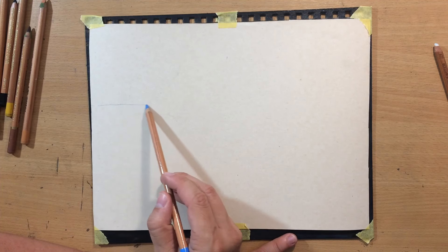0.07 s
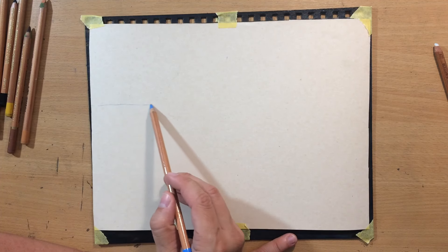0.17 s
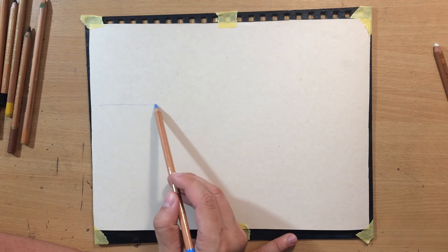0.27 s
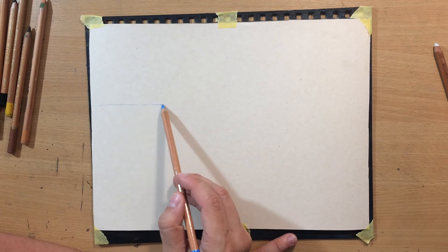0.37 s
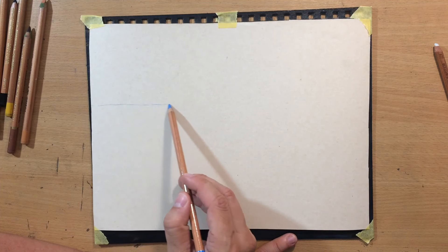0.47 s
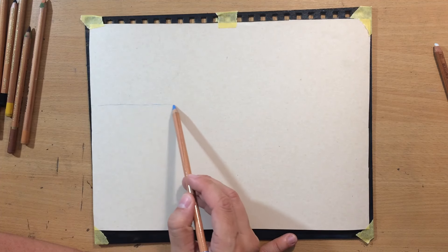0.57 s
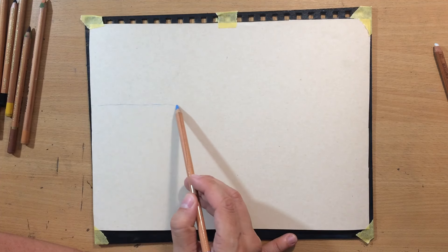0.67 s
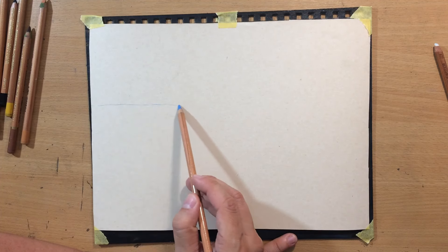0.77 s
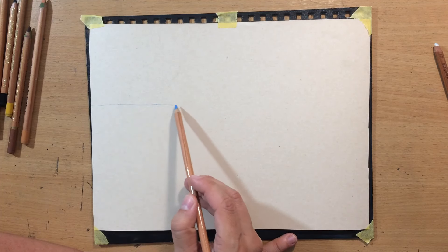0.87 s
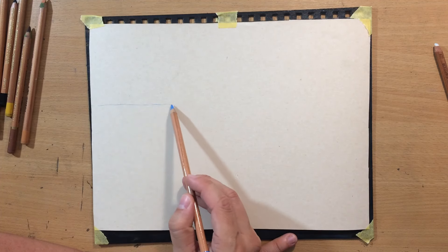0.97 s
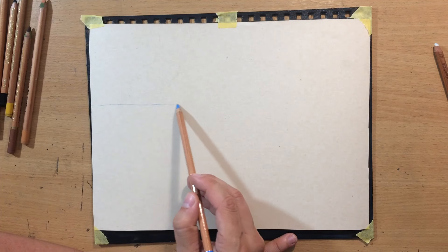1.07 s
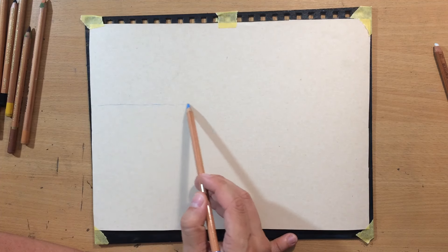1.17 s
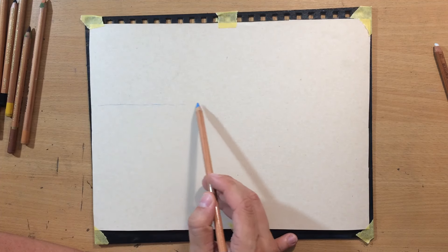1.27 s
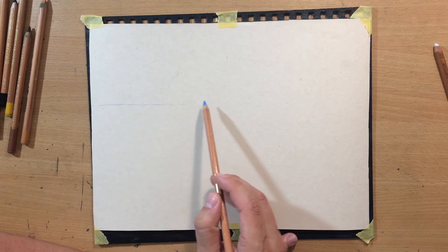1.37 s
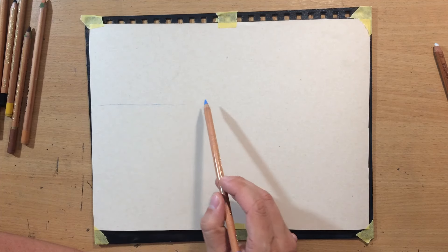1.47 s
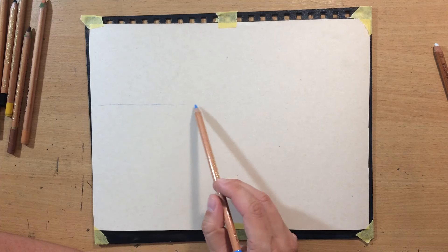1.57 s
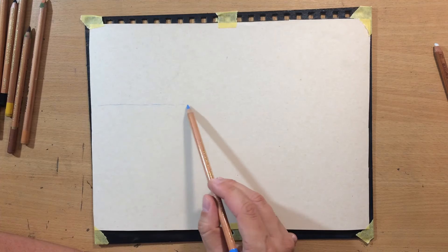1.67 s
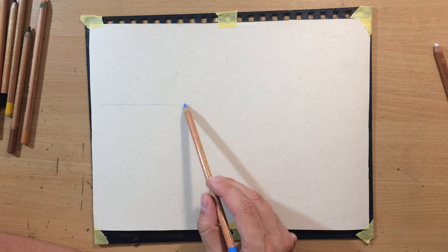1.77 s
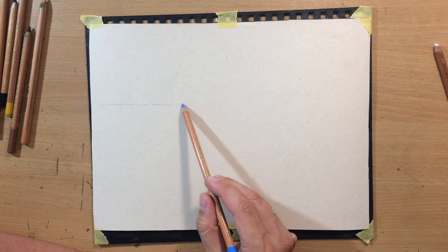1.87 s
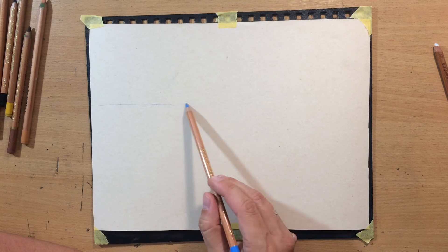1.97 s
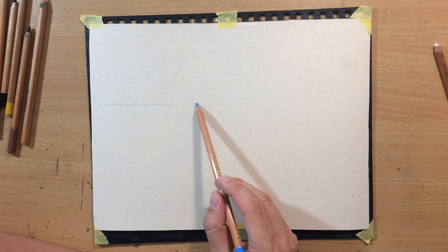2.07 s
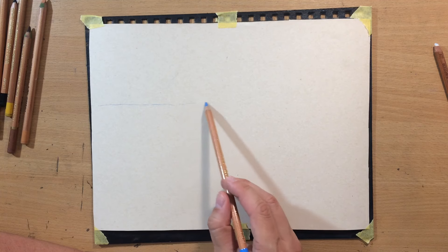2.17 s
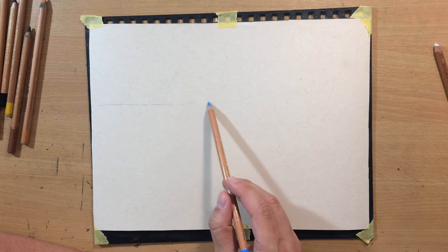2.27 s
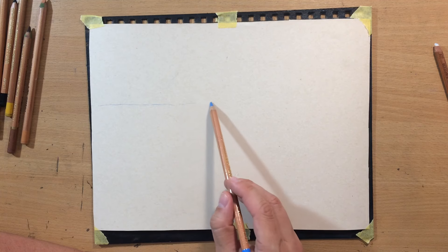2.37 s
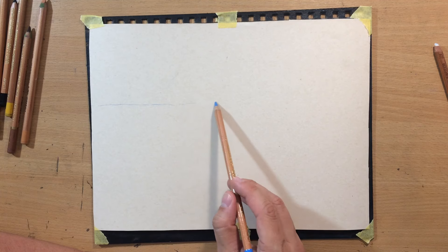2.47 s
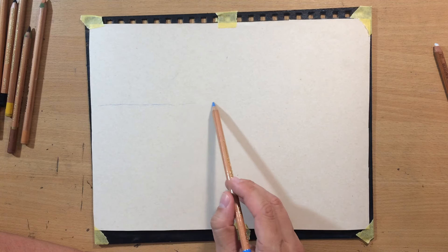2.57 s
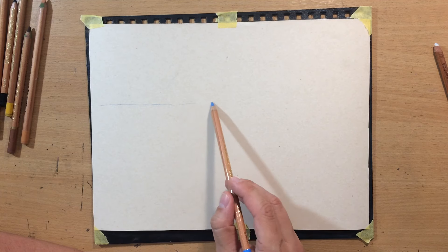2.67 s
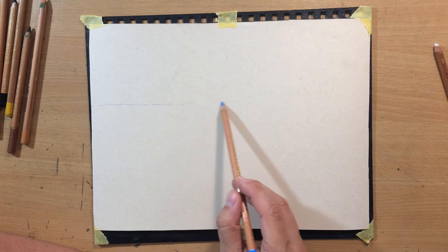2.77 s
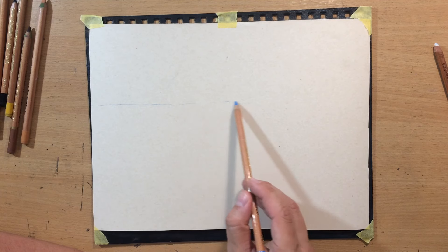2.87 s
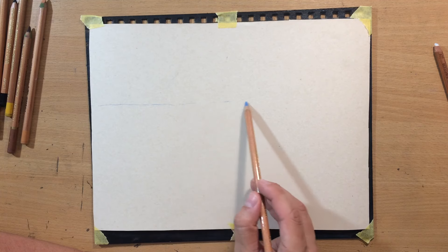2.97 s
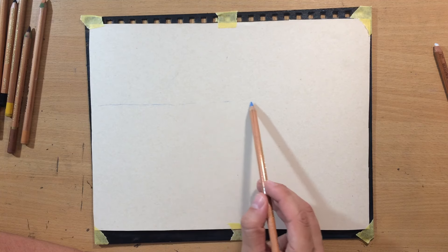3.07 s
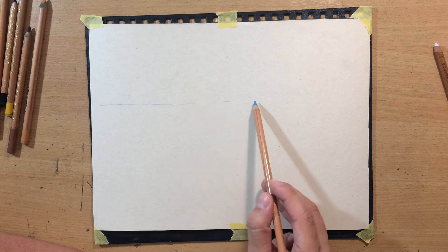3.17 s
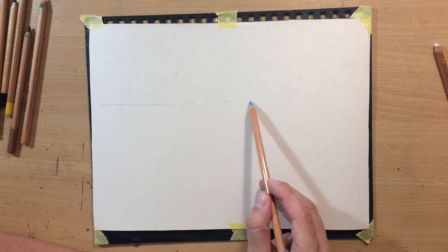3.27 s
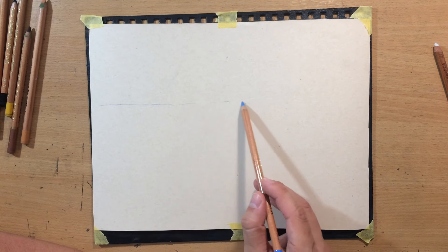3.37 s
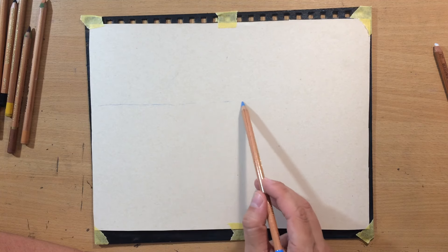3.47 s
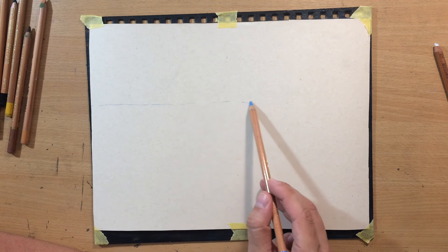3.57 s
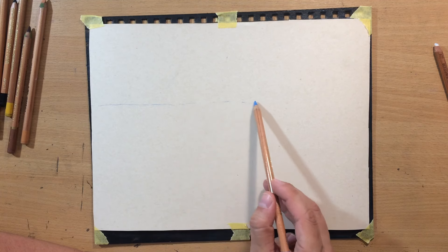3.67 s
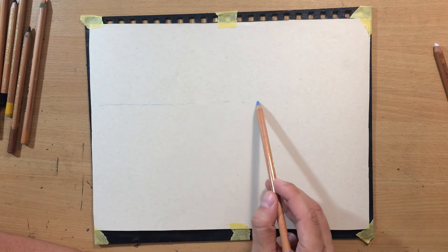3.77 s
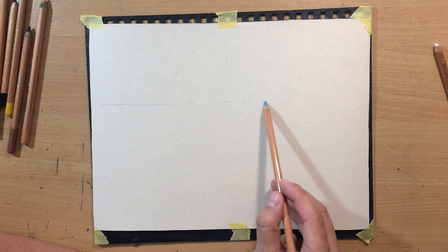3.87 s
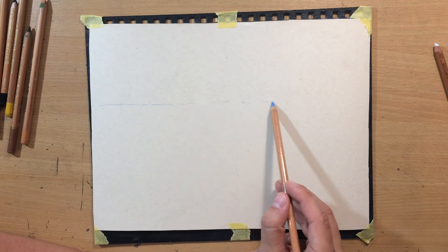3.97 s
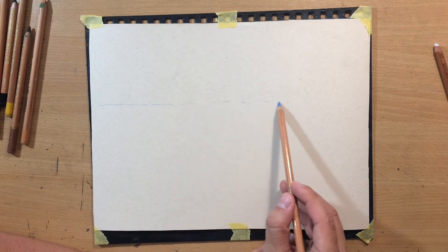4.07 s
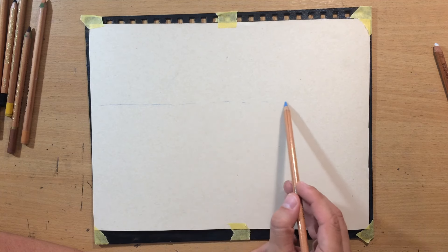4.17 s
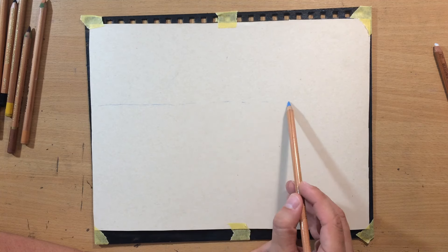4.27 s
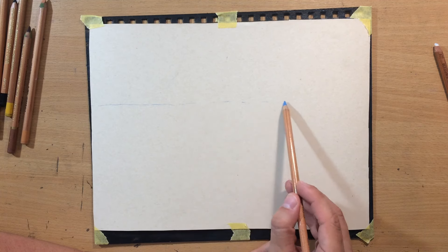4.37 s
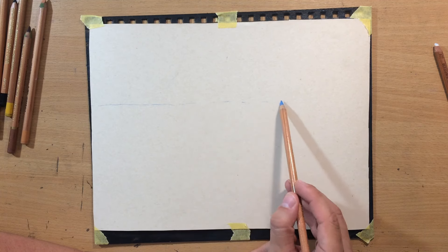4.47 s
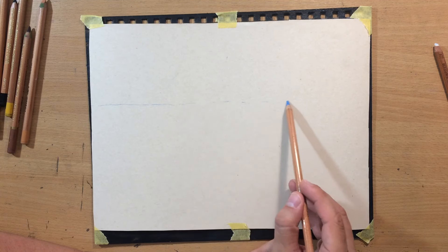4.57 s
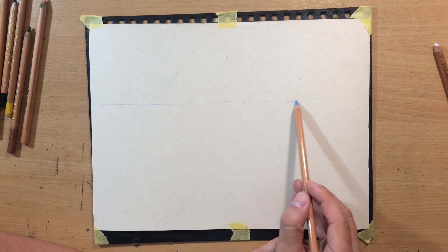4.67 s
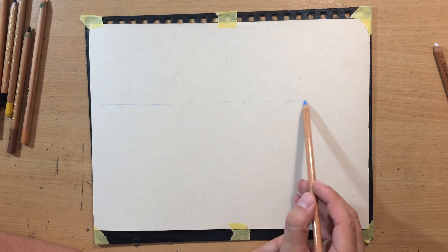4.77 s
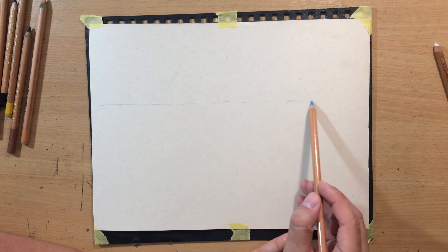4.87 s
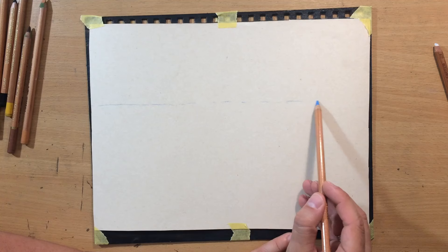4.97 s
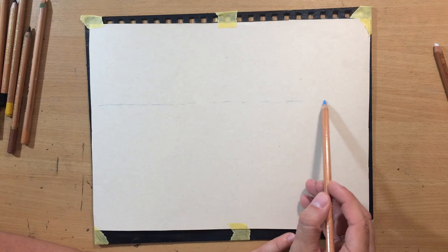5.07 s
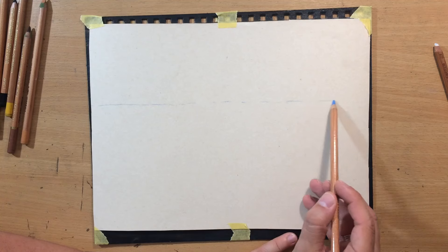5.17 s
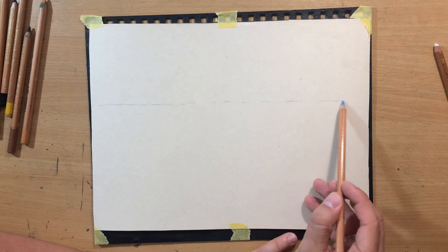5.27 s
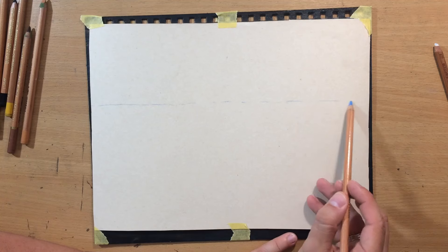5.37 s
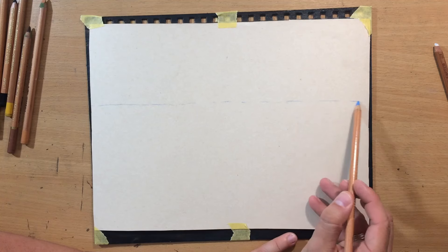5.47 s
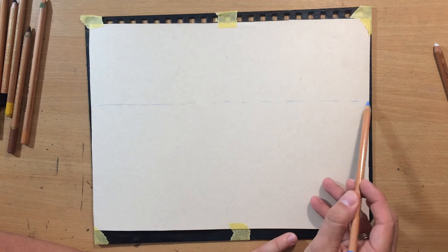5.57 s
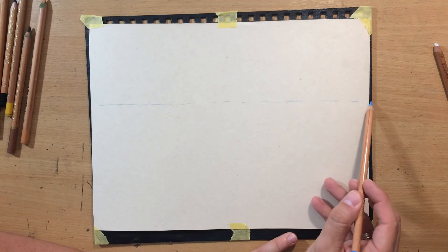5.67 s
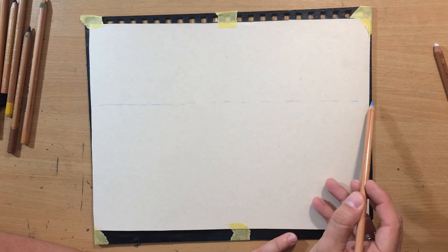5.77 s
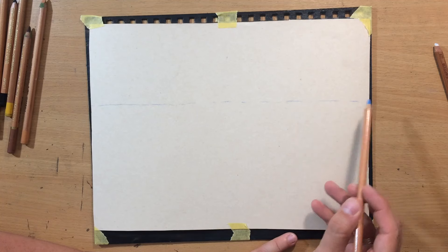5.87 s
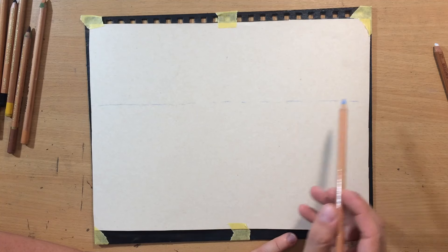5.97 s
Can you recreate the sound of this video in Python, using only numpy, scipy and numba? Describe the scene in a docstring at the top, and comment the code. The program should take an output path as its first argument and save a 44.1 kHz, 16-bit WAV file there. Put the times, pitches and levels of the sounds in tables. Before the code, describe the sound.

A pencil tip scrapes along sanded paper in one slow stroke, followed by a cluster of dull taps and small clicks as the pad bumps the desk and a hand shifts softly. A run of brief, uneven scratches follows, with a longer rasping stroke near the end. The sounds are quiet, dry and close, in a small room where a distant motor hums steadily.

```python
"""Pastel pencil on sanded paper

Close to one microphone in a small room, a pastel pencil draws a broken line across sanded paper
taped to a pad on a wooden desk. The tip catches on the grit: a bright rasp, and a ring of the lead
near 2 kHz that follows the grip. The pencil taps the pad against the desk as the hand shifts.
Farther off, a motor hums steadily under soft room air."""
import sys
import numpy as np
from scipy import signal
from scipy.fft import rfft, irfft
from scipy.io import wavfile
from scipy.ndimage import uniform_filter1d, map_coordinates
from numba import njit

SR = 44100
rng = np.random.default_rng(int(sys.argv[2]) if len(sys.argv) > 2 else 0)


def persist_wave(psi):
    """Save psi, clipped to +-1, as 16-bit WAV."""
    counts = np.round(np.clip(psi, -1, 1) * 32767).astype(np.int16)
    wavfile.write(sys.argv[1], SR, np.atleast_2d(counts).T)


N = 265790
TIME = np.arange(N) / SR


def pencil():
    """Fine grit makes the rasp; coarser catches ring the lead; the sheet radiates both."""
    stroke_rasp, stroke_ring, stroke_grip = quick_strokes()
    drag_rasp, drag_ring, drag_grip = slow_drags()
    rasp_gain, ring_gain = add_snags(stroke_rasp + drag_rasp, stroke_ring + drag_ring)
    lead_hz, lead_width, overtone_db, bright_db = curves(sorted(stroke_grip + drag_grip))
    tooth = drift(260)  # the paper's uneven tooth shakes the contact force
    rasp = tip_rasp(tooth, bright_db)
    ring = lead_ring(tooth, lead_hz, lead_width, overtone_db)
    return sheet_resonances(rasp_gain * rasp + ring_gain * ring)


# Quick strokes on the paper, close to the microphone. Each row: landing, lift, attack and release in
# seconds, rasp level, ring level, midway sag and tightening of the grip in dB, ring pitch and width
# in Hz, overtones and brightness in dB.
QUICK_STROKES = [ (1.204, 1.293, 0.0052, 0.0026, -44.5, -42.5, -2, -4.5, 2120, 393, 4, -1.5),
                 (2.109, 2.243, 0.017, 0.029, -46.5, -46.5, -2, 4, 2120, 800, 3, -0.5),
                 (2.35, 2.54, 0.0033, 0.11, -59.5, -55.5, 5, 1, 2000, 604, -9, -33),
                 (2.541, 2.617, 0.007, 0.022, -49.5, -51, 3.5, 7, 1930, 560, 5, -1.5),
                 (2.896, 2.991, 0.025, 0.012, -47, -45.5, 1.5, 5, 2050, 402, -2, 8),
                 (3.164, 3.294, 0.032, 0.036, -58, -75, -0.5, 14, 1840, 500, 14, -4.5),
                 (3.59, 3.672, 0.056, 0.015, -54, -55.5, -4.5, 11, 1860, 447, -5, 8),
                 (3.949, 4.248, 0.0074, 0.019, -46, -48, 4, 9, 2100, 580, -29, -4),
                 (4.682, 4.914, 0.0009, 0.028, -47, -47.5, -2, 8, 2130, 540, -8, -2),
                 (5.493, 5.625, 0.0098, 0.0034, -49.5, -44, 3, 5, 2080, 790, 3, 2), ]

def quick_strokes(edge_db=12.5, glide_hz_per_db=22):
    """Rasp gain, ring gain and grip rows of strokes that press more lightly at both ends."""
    rasp_gain, ring_gain, grip = np.zeros(N), np.zeros(N), []
    for start, end, attack_s, release_s, *stroke in QUICK_STROKES:
        rasp_db, ring_db, sag_db, tighten_db, hz, *tone = stroke
        along = np.clip((TIME - start) / (end - start), 0, 1)
        landing = np.clip(1 - (TIME - start) / attack_s, 0, 1)
        lifting = np.clip(1 - (end - TIME) / release_s, 0, 1)
        pressure_db = -edge_db * (landing + lifting) - sag_db * np.sin(np.pi * along) ** 2
        contact = touch(start, end, rise_s=0.00029, fall_s=0.014)
        rasp_gain += contact * undb(rasp_db + pressure_db)
        # a tighter grip rings the lead harder and higher
        ring_gain += contact * undb(ring_db + pressure_db + tighten_db * (along - .5))
        glide_hz = glide_hz_per_db * tighten_db
        grip += [(start, hz - glide_hz / 2, *tone), (end, hz + glide_hz / 2, *tone)]
    return rasp_gain, ring_gain, grip


# Two slow drags over the paper, a list each. Each row: time in seconds, rasp and ring levels in dB.
DRAG_LEVELS = [
    [(0.0, -50, -45), (0.05, -53, -41.5), (0.196, -55, -49), (0.298, -54.5, -46), (0.416, -53.5, -56),
     (0.486, -46.5, -46), (0.49, -48.5, -43.5), (0.71, -55, -51), (0.718, -57.5, -48),
     (0.756, -61.5, -58.5), (0.814, -58.5, -52.5), (0.82, -63, -56)],
    [(4.965, -58, -59), (4.977, -57, -45.5), (4.999, -52.5, -41), (5.083, -57, -50.5), (5.091, -55, -43.5),
     (5.129, -53, -42.5), (5.163, -54.5, -43), (5.277, -45.5, -40), (5.305, -50.5, -44), (5.369, -45, -45),
     (5.377, -48.5, -40.5), (5.39, -52, -49)],
]
# The lead's ring, a list for each drag. Each row: time in seconds, pitch and width in Hz.
DRAG_GRIPS = [
    [(0.0, 2460, 344), (0.1, 2390, 332), (0.2, 2230, 440), (0.31, 2290, 340), (0.48, 2220, 423),
     (0.54, 2100, 1082), (0.61, 2130, 850), (0.72, 2200, 440), (0.82, 2210, 380)],
    [(4.965, 2100, 600), (5.01, 2130, 447), (5.07, 2280, 900), (5.1, 1930, 1310), (5.2, 2160, 830),
     (5.27, 2230, 640), (5.32, 2310, 500), (5.39, 2230, 650)],
]
# The colour of each drag. Each row: overtones in dB, brightness in dB.
DRAG_COLOURS = [(-4, 0.5), (-2, 1)]

def slow_drags():
    """Gains and grip rows of the drags: the ring's pitch and width glide along each drag."""
    rasp_gain, ring_gain, grip = np.zeros(N), np.zeros(N), []
    for levels, rings, tone in zip(DRAG_LEVELS, DRAG_GRIPS, DRAG_COLOURS):
        rasp_db, ring_db = curves(levels)
        contact = touch(levels[0][0], levels[-1][0], rise_s=0.00062, fall_s=0.002)
        rasp_gain += contact * undb(rasp_db)
        ring_gain += contact * undb(ring_db)
        grip += [(*row, *tone) for row in rings]
    return rasp_gain, ring_gain, grip


# Snags along the line. Each row: start in seconds, rasp level in dB, length in seconds, ring in dB
# relative to the rasp.
TIP_SNAGS = [(0.066, -65.5, .01, 22), (0.298, -59, 0.013, 16), (0.456, -57, 0.008, 14),
             (0.475, -56, 0.0058, 11), (2.318, -45.5, 0.0048, -17), (2.3437, -40.5, 0.0031, -12),
             (2.871, -61.5, 0.011, 4), (3.095, -53, 0.013, 2.5), (3.533, -63.5, 0.0025, -1),
             (3.978, -40.5, 0.0078, -14), (4.044, -46.5, 0.049, -4), (4.686, -54, 0.0135, 13.5),
             (4.86, -56.5, 0.016, 15), (5.212, -51, 0.0064, 10.5), (5.261, -49.5, 0.025, 5),
             (5.616, -46.5, 0.0051, 5.5), (5.849, -72, .008, 1)]

def add_snags(rasp_gain, ring_gain):
    """The tip snags or just touches the grit, briefly adding power to rasp and ring."""
    for start, db, length, ring_db in TIP_SNAGS:
        contact = touch(start, start + length, rise_s=0.0011, fall_s=0.0013)
        rasp_gain = np.hypot(rasp_gain, contact * undb(db))
        ring_gain = np.hypot(ring_gain, contact * undb(db + ring_db))
    return rasp_gain, ring_gain


# The rasp right at the tip. Each row: frequency in Hz, relative level in dB.
RASP_SPECTRUM = [(200, -13), (700, -12.5), (1000, -6), (1250, -2), (1470, -3), (1750, 3), (2600, 1),
                 (3300, 4), (4600, 4), (5700, 1), (6800, -1), (7600, -0.5), (8700, -3), (9600, -3),
                 (12500, -5.5), (15800, -9)]

def tip_rasp(tooth, bright_db):
    """Pigment breaks on the abrasive in tiny fractures; each stroke has its own brightness."""
    fractures = grit(per_s=14000, spread_db=5.5) * undb(0.72 * tooth)
    rasp = short_echoes(unit(colour(fractures, RASP_SPECTRUM)))
    return rasp + (undb(bright_db) - 1) * resonate(rasp, hz=9400, width=17700)


# Higher modes of the lead. Each row: frequency in Hz, width in Hz, relative level in dB.
LEAD_OVERTONES = [(2960, 660, -20.5), (5540, 340, -19), (7000, 410, -30)]

def lead_ring(tooth, lead_hz, lead_width, overtone_db, wander_share=0.013, skirt_widths=2.1):
    """Coarse catches ring the lead, whose pitch wavers as the tip rocks on the grit."""
    catches = grit(per_s=3500, spread_db=3.5) * undb(0.73 * tooth)
    catches = highpass(catches, hz=1300, order=2)  # the thin tip radiates little bass
    lead_hz = lead_hz * (1 + wander_share * drift(30))
    ring = resonate(catches, lead_hz, lead_width)
    ring = resonate(ring, lead_hz, skirt_widths * lead_width)  # steepens the flanks of the peak
    ring *= np.sqrt(lead_width.mean() / lead_width)  # less damping: a narrower, taller peak
    for hz, width, db in LEAD_OVERTONES:
        overtone = resonate(catches, hz, width)
        ring += undb(db + overtone_db) * resonate(overtone, hz, width=1600)
    return unit(ring)


# Two short echoes of the rasp that change along the line. Each row: time in seconds, delay of the inverted echo
# in ms, its share, delay of the upright echo in ms, its share.
SHORT_ECHOES = [ (0.05, 0.43, 0.22, 0.315, 0.13), (0.75, 0.41, 0.16, 0.3, 0.15),
                (1.2, 0.36, 0.16, 0.94, 0.1), (1.32, 0.37, 0.19, 1.2, 0.1), (2.1, 0.36, 0.1, 0.7, 0.14),
                (2.26, 0.54, 0.14, 0.78, 0.11), (2.53, 0.65, 0.15, 0.6, 0.13), (3.0, 0.87, 0.15, 0.53, 0.13),
                (3.58, 1, 0.14, 0.9, 0.19), (3.7, 0.91, 0.14, 0.97, 0.16), (3.95, 0.442, 0.22, 0.45, 0.11),
                (4.26, 0.44, 0.12, 0.41, 0.15), (4.68, 0.48, 0.1, 0.31, 0.11),
                (4.92, 0.39, 0.13, 0.33, 0.16), (4.96, 0.54, 0.14, 0.56, 0.18),
                (5.24, 0.465, 0.16, 0.547, 0.15), (5.63, 0.455, 0.26, 0.52, 0.15), ]

def short_echoes(x):
    """Two short echoes shift with the place of the tip, so each place has its own hollow colour."""
    inverted_ms, inverted_share, upright_ms, upright_share = curves(SHORT_ECHOES)
    return unit(x - inverted_share * delay(x, inverted_ms) + upright_share * delay(x, upright_ms))


# The sheet under the travelling tip. Each row: time in seconds, lower resonance in Hz, its gain in dB,
# upper resonance in Hz, its gain in dB, dead spot in Hz.
SHEET_MODES = [ (0.05, 2980, 4, 5500, 0, 3720), (0.28, 2540, 5, 5614, 7, 4685),
               (0.6, 2500, 1, 5960, 1.5, 7160), (1.25, 3850, 5, 4700, 2, 2460),
               (2.18, 2460, 5.5, 3280, 2.5, 2680), (2.6, 3160, 5, 4170, 0, 2600),
               (2.89, 2840, 16, 3540, 7, 4040), (3.0, 2920, 3, 3750, 2, 4030),
               (3.64, 3950, -7, 5500, -3, 4300), (4.1, 3820, 4.5, 4900, -0.5, 3270),
               (4.8, 3100, 3.5, 4900, 3, 2750), (4.98, 3230, 8, 5260, 2, 4700),
               (5.22, 3430, 0, 5540, 7.5, 4900), (5.38, 3420, 7, 5730, 0, 4720),
               (5.5, 2650, -3, 3400, -8, 4200), (5.63, 2670, 5.5, 3450, 3, 4180), ]

def sheet_resonances(x, dead_db=-8):
    """Two resonances and a dead spot of the paper move with the place of the tip."""
    low_hz, low_db, high_hz, high_db, dead_hz = curves(SHEET_MODES)
    for hz, db in ((low_hz, low_db), (high_hz, high_db), (dead_hz, dead_db)):
        x = x + (undb(db) - 1) * resonate(x, hz, width=0.09 * hz / undb(db / 2))
    return x


# Taps of the pad on the desk, close by. Each row: start in seconds, thud and click levels in dB, tick
# pitch in Hz, its level in dB, hardness in dB per octave, desk thump pitch in Hz, its level in dB.
PAD_TAPS = [(1.1305, -33, -37.5, 4820, -34, 1.5, 169, -52), (1.1698, -31, -32.5, 4920, -35, -1, 151, -40),
            (1.1832, -29.5, -35, 4900, -38, -1.5, 172, -33.5), (1.4525, -30, -38, 4740, -37, -5, 112, -35),
            (1.699, -37, -49, 4860, -50, -1, 170, -39.5), (1.853, -42.5, -49, 4900, -58, 0.5, 175, -58),
            (1.997, -51, -62, 4900, -70, -3, 140, -62), (2.036, -50, -51, 5840, -57, 1, 139, -63),
            (2.062, -59, -55, 6170, -52, 6, 140, -56), (2.236, -51, -37, 5700, -44, 9, 141, -56),
            (5.854, -54, -58, 4970, -73, 5, 140, -57)]
# The pad's low modes. Each row: frequency in Hz, dB relative to the thud, 60 dB decay in seconds.
PAD_MODES = [(165, -10, 0.1), (229, -11, 0.09), (292, -4.5, 0.037), (364, -5.5, 0.033), (467, -9, 0.024),
             (593, -12, 0.075), (660, -7.5, 0.029), (778, -12.5, 0.077), (942, -13.5, 0.055),
             (1060, -15.5, 0.034), (1447, -10, 0.041)]
# The pencil's modes. Each row: multiple of the tick pitch, relative dB, 60 dB decay in seconds.
TICK_MODES = [(0.61, -5, 0.017), (0.67, -6.5, 0.014), (1, -0.5, 0.014), (1.11, -9, 0.013),
              (1.33, -18, 0.013)]
# The click where the pencil lands. Each row: frequency in Hz, gain in dB.
CLICK_SPECTRUM = [(500, 2), (1400, -10), (2200, 2), (3000, 7), (3600, -2), (4200, -2), (4900, 4),
                  (5800, -3), (6600, -11), (8500, -18), (15000, -33)]

def pad_taps(click_s=0.0033, push_cycles=0.65, thump_t60_s=0.097):
    """A dry click and the pencil's short wooden tick, a thud of the pad, the desk's thump under it."""
    taps = np.zeros(N)
    t = TIME[:SR // 4]
    for start, thud_db, click_db, tick_hz, tick_db, hardness, thump_hz, thump_db in PAD_TAPS:
        burst = rng.standard_normal(len(t)) * np.exp(-t / click_s)
        blow = undb(click_db) * colour(burst, CLICK_SPECTRUM)
        modes = [(thump_hz, thump_db, thump_t60_s)]
        modes += [(hz, thud_db + db + hardness * np.log2(hz / 500), t60) for hz, db, t60 in PAD_MODES]
        modes += [(tick_hz * ratio, tick_db + db, t60) for ratio, db, t60 in TICK_MODES]
        for hz, db, t60 in modes:
            rise = 1 - np.exp(-t * hz / push_cycles)
            blow += undb(db - 60 * t / t60) * rise * np.sin(2 * np.pi * (hz * t + rng.random()))
        i = int(start * SR)
        taps[i:i + len(t)] += blow[:N - i]
    return highpass(taps, hz=75, order=3)  # so small a pad radiates little deep bass


# The side of the hand shifts on the sheet, beside the tip. Each row: middle and half length in
# seconds, brush level in dB, desk rumble level in dB.
HAND_SHIFTS = [(1.123, 0.0099, -80, -50), (1.61, 0.41, -72, -72), (1.82, 0.041, -89, -58),
               (2.043, 0.042, -72, -62), (2.28, 0.18, -93, -54), (4.322, 0.083, -69.5, -90)]

def hand(rock_s=0.018, rock_db=-20):
    """Skin brushes softly over the sheet, and its drag makes the desk rumble."""
    brush_gain = sum(undb(db) * swell(s, half_s) for s, half_s, db, _ in HAND_SHIFTS)
    rumble_gain = sum(undb(db) * swell(s, half_s) for s, half_s, _, db in HAND_SHIFTS)
    for start, thud_db, *_ in PAD_TAPS:  # the pad rocks just before each tap
        rumble_gain += undb(thud_db + rock_db) * swell(start - rock_s, rock_s)
    friction = grit(per_s=6500, spread_db=-2.5) * undb(0.93 * drift(24.63))
    brush = resonate(friction, hz=3300, width=3700)
    rumble = resonate(resonate(friction, hz=208, width=56), hz=150, width=440)
    return unit(brush) * brush_gain + unit(rumble) * rumble_gain


def desk_reflections(x, share=0.12, drift_ms_per_s=0.3, count=7):
    """Hand, desk and things on it reflect the pencil; the paths change as it crosses the sheet."""
    paths = zip(rng.uniform(1, 7, count), rng.uniform(-1.26, 1, count))
    echoes = sum(delay(x, ms + drift_ms_per_s * slope * (TIME - TIME.mean())) for ms, slope in paths)
    return (x + share * echoes) / np.sqrt(1 + count * share ** 2)


def room(x, wet_db, low_db, t60_low, t60_high, gap_s):
    """Diffuse echoes of the small room, with their own level and decay below and above 5 kHz."""
    t = TIME[:SR]
    noise = rng.standard_normal(len(t))
    low = signal.sosfiltfilt(signal.butter(2, 5000, fs=SR, output="sos"), noise)
    tail = low * undb(low_db - 60 * t / t60_low) + (noise - low) * undb(-60 * t / t60_high)
    tail *= np.clip(t / gap_s - 1, 0, 1)  # the echoes arrive after the direct sound
    return x + undb(wet_db) * signal.fftconvolve(x, tail / np.linalg.norm(tail))[:N]


# A motor somewhere away from the desk. Each row: frequency in Hz, rms level in dB, waver as a share.
MOTOR_TONES = [(121, -68.5, 0.27), (172.5, -54.5, 0.18), (202, -64, 0.2), (236.7, -71.5, 1.1),
               (286, -69.5, 1.5), (317.6, -72.5, 1.4)]

def motor_hum():
    """A motor hums, each low tone wavering in level and phase."""
    hum = np.zeros(N)
    for hz, db, waver in MOTOR_TONES:
        wobble = 1 + waver * (drift(9) + 1j * drift(5.6))
        tone = np.exp(2j * np.pi * (hz * TIME + rng.random()))
        hum += undb(db) * np.sqrt(2) * np.real(wobble * tone) / np.sqrt(1 + 2 * waver ** 2)
    return hum


# Room tone all around the microphone. Each row: frequency in Hz, relative level in dB.
AIR_SPECTRUM = [(25, -19), (50, -5), (90, -3), (140, 3), (200, 4), (300, -1.5), (420, -7), (700, -8),
                (1100, -11), (1700, -11.5), (3000, -18.5), (6000, -24), (10000, -29), (15500, -29)]

def room_air(level_db=-60.5):
    """The air of the room is a soft, dark, steady noise."""
    return undb(level_db) * unit(colour(rng.standard_normal(N), AIR_SPECTRUM))


def grit(per_s, spread_db):
    """Tiny random impulses of uneven size, as one surface catches on another."""
    hits = rng.random(N) < per_s / SR
    signs = rng.choice([-1, 1], N)
    sizes = undb(spread_db * np.clip(rng.standard_normal(N), -2, 2))
    return unit(hits * signs * sizes)


def touch(start, end, rise_s, fall_s):
    """The tip lands quickly, stays, and lifts off."""
    return np.clip((TIME - start) / rise_s, 0, 1) * np.exp(-np.maximum(TIME - end, 0) / fall_s)


def swell(middle, half_s):
    """A smooth rise and fall around a moment."""
    return np.exp(-np.minimum(((TIME - middle) / half_s) ** 2, 50))


def drift(per_s):
    """Smoothed random steps with rms 1."""
    hold = int(SR / per_s)
    steps = np.repeat(rng.standard_normal(N // hold + 1), hold)
    return unit(uniform_filter1d(uniform_filter1d(steps, hold), hold)[:N])


def curves(rows):
    """Join (seconds, value, ..) rows by straight lines, one curve a column."""
    times, *columns = np.transpose(rows)
    return [np.interp(TIME, times, column) for column in columns]


def delay(x, ms):
    """Read a sound late by a time that may move."""
    return map_coordinates(x, [np.arange(N) - ms * SR / 1000], order=3)


def colour(x, points, size=2048):
    """Minimum-phase filter through (Hz, dB) points."""
    hz, db = np.transpose(points)
    grid_hz = np.maximum(np.arange(size // 2 + 1) * SR / size, 1)
    gain = undb(np.interp(np.log(grid_hz), np.log(hz), db))
    cepstrum = irfft(np.log(gain))
    causal_fold = np.r_[1, np.full(size // 2 - 1, 2), np.zeros(size // 2)]
    impulse = irfft(np.exp(rfft(cepstrum * causal_fold)))
    return signal.fftconvolve(x, impulse)[:len(x)]


def resonate(x, hz, width):
    """One resonance, steady or moving, with centre and width in Hz."""
    return moving_bandpass(x + 1e-18, hz * np.ones(len(x)), width * np.ones(len(x)))


@njit
def moving_bandpass(x, hz, width):
    """State-variable band-pass with gain 1 at its centre."""
    y, band_state, low_state = np.empty(len(x)), 0., 0.
    for i in range(len(x)):
        tuning, damping = np.tan(np.pi * hz[i] / SR), width[i] / hz[i]
        band = (band_state + tuning * (x[i] - low_state)) / (1 + tuning * (tuning + damping))
        band_state = 2 * band - band_state
        low_state += 2 * tuning * band
        y[i] = damping * band
    return y


def highpass(x, hz, order):
    """Roll off the bass."""
    return signal.sosfilt(signal.butter(order, hz, "high", fs=SR, output="sos"), x)


def undb(db):
    """Decibels to gain."""
    return 10 ** (np.asarray(db) / 20)


def unit(x):
    """Scale to rms 1."""
    return x / np.sqrt(np.mean(x ** 2))


def scene():
    """Pencil, pad and hand close to one microphone, with the room behind them."""
    drawing = desk_reflections(pencil())
    drawing = room(drawing, wet_db=-9.0, low_db=-3.0, t60_low=0.35, t60_high=0.35, gap_s=0.0016)
    handling = room(pad_taps() + hand(), wet_db=-16, low_db=0, t60_low=0.2, t60_high=0.16, gap_s=0.004)
    return (drawing + handling + motor_hum() + room_air())[None]


def record(dry, top_hz=15800):
    """The recorder cuts the top treble steeply."""
    return signal.sosfilt(signal.ellip(10, .2, 60, top_hz, fs=SR, output="sos"), dry)


dry = scene()
out = record(dry)
persist_wave(out)
```